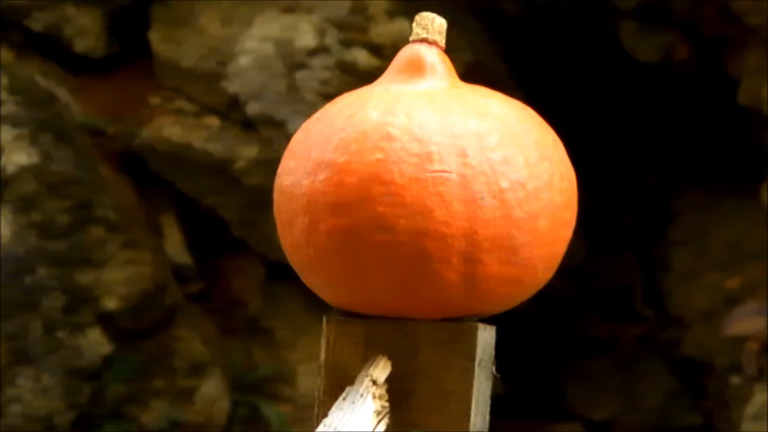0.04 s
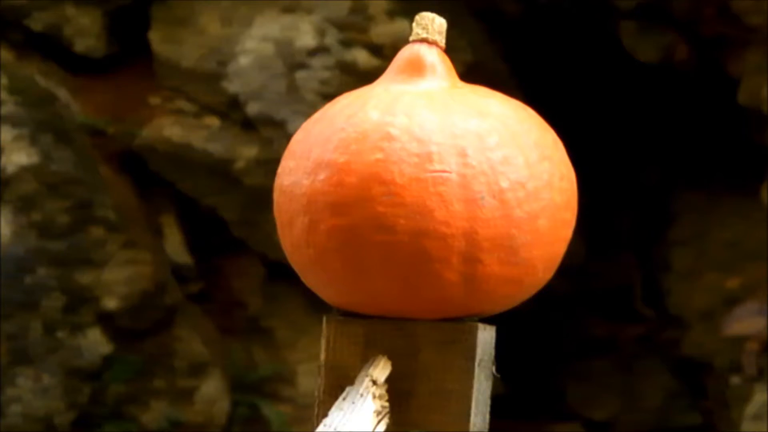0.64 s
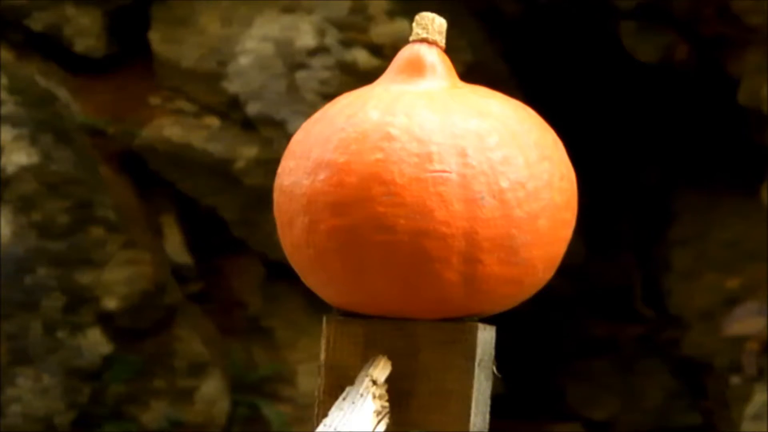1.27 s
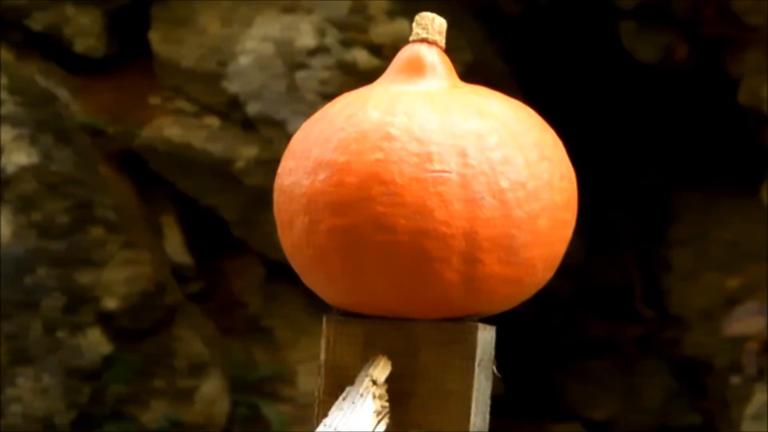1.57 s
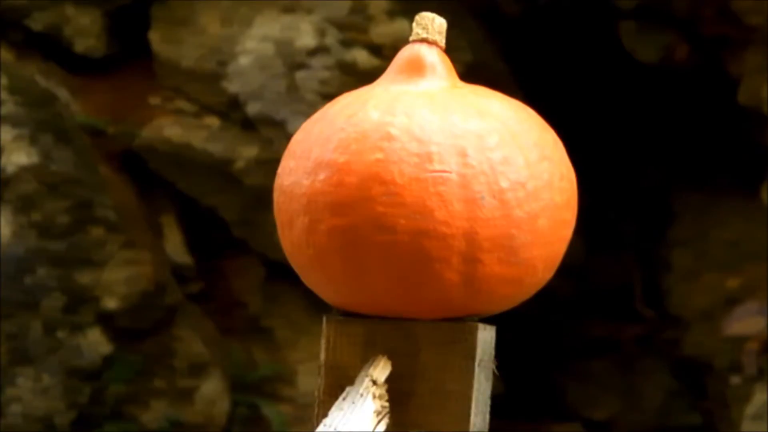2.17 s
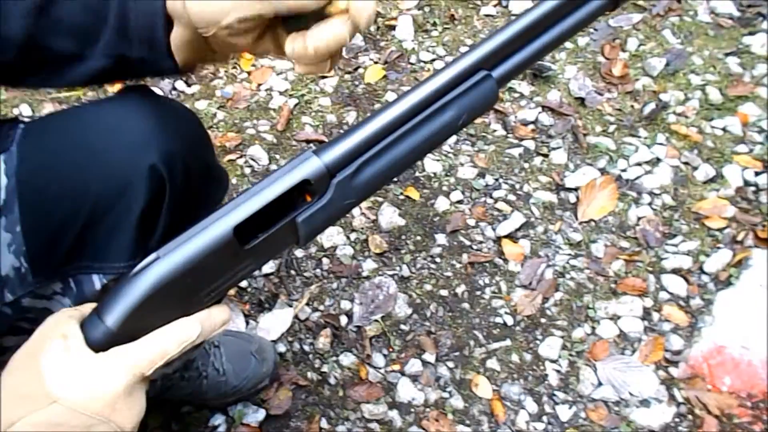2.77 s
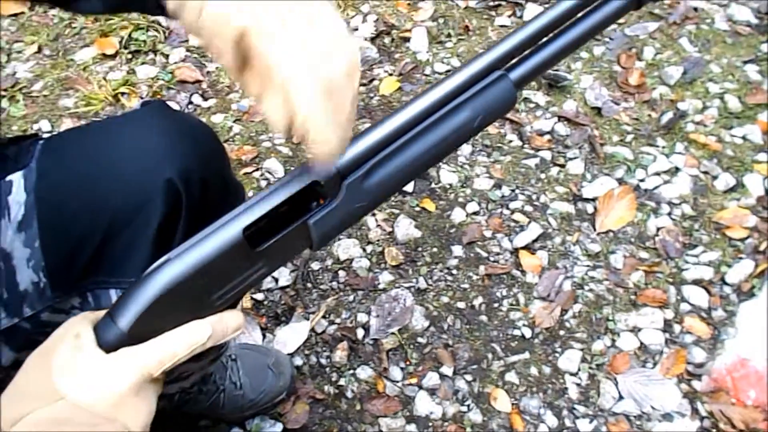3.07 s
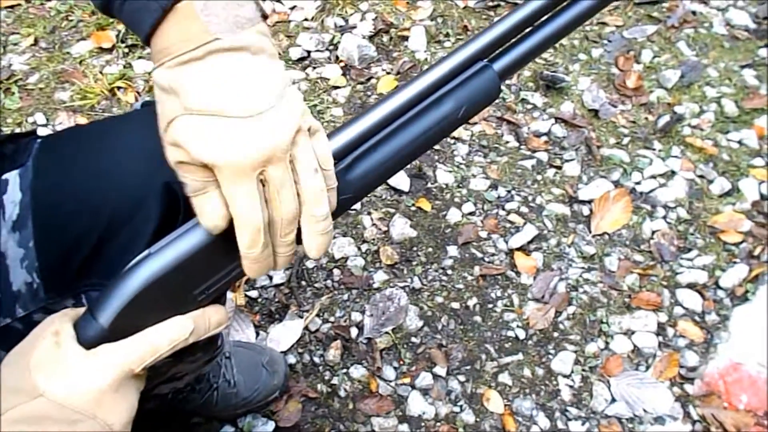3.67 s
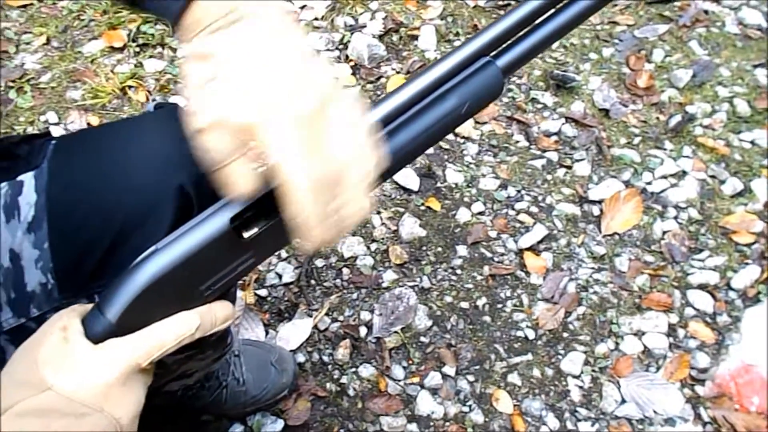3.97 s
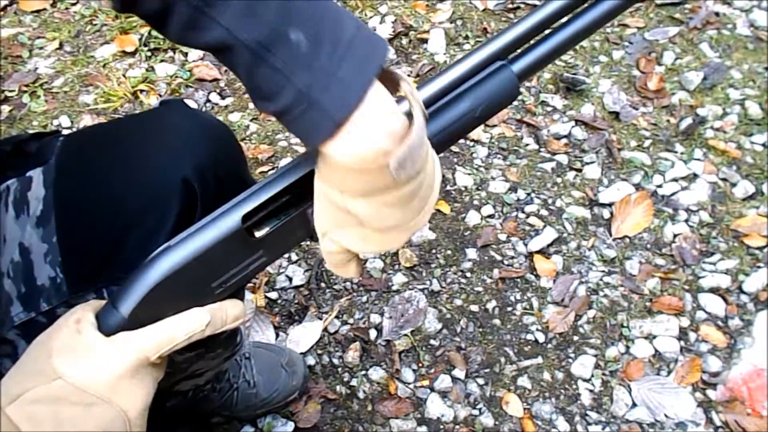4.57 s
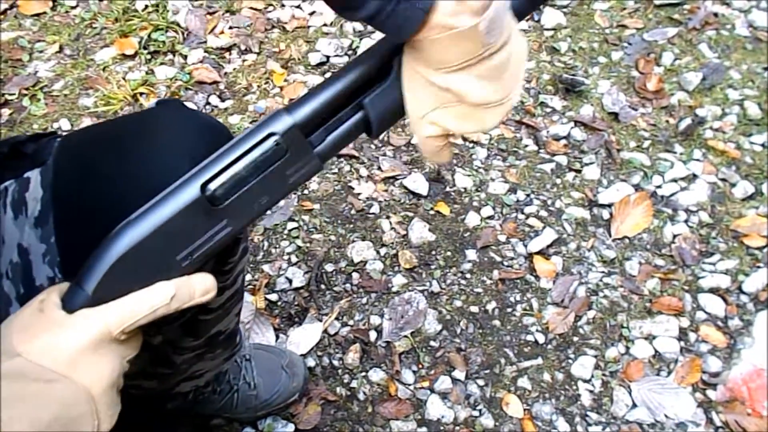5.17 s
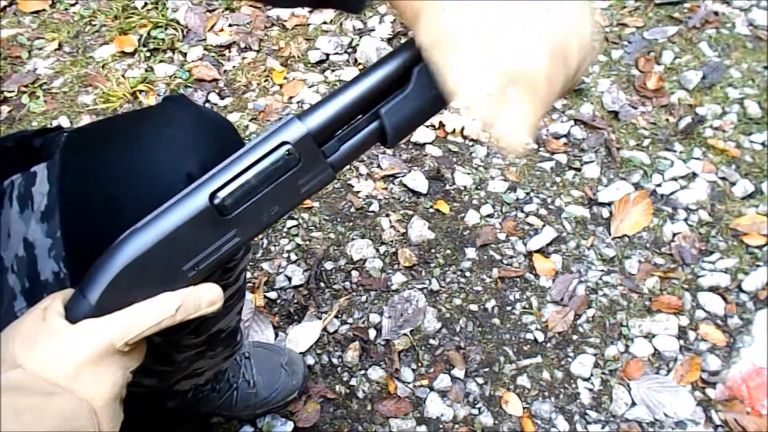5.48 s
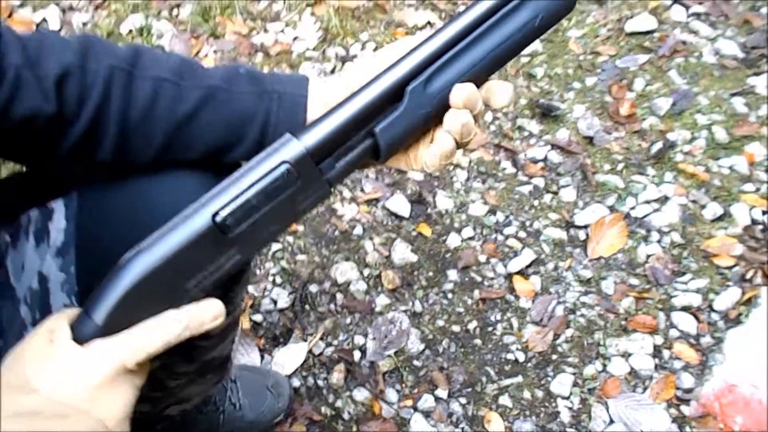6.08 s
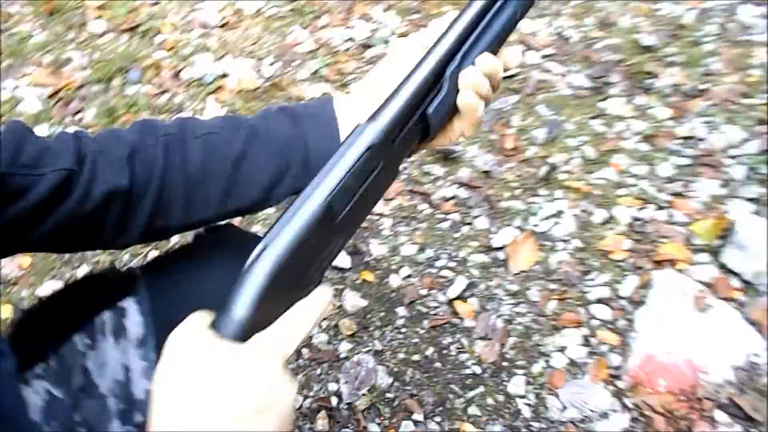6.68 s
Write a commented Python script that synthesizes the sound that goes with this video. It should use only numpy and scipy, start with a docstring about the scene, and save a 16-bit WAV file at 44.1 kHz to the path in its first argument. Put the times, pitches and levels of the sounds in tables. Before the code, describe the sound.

Over steady outdoor hiss, a shell rattles into a shotgun and the pump slides shut, first distant and echoing, then close and dry.

```python
"""A pump shotgun is loaded in a forest: a shell ticks into the open port and rattles home, then the
forend runs forward and the bolt locks. Each contact rings the receiver; steel slides, a glove brushes.
It is heard twice, with silence between: from a distant microphone, with the echo of the trees, then
nearly dry from one on the shooter. Each has its own outdoor hiss and its own treble notches."""
import sys
import numpy as np
from scipy import signal
from scipy.fft import rfft, irfft, next_fast_len
from scipy.io import wavfile
from scipy.ndimage import uniform_filter1d

SR = 44100
rng = np.random.default_rng(int(sys.argv[2]) if len(sys.argv) > 2 else 0)


def dump_mix(stems):
    """Bounce the given channels to the path in sys.argv[1] as a 16-bit WAV at rate SR."""
    frames = np.atleast_2d(stems).T  # one column per channel
    limited = np.clip(frames, -1, 1)  # hard clip at full scale
    pcm = np.round(limited * 32767).astype(np.int16)
    wavfile.write(sys.argv[1], SR, pcm)


N = 305789
TIME = np.arange(N) / SR
FAR_SPAN_S, NEAR_SPAN_S = (.175, 2.726), (3.192, 7)   # when each microphone is heard


def from_db(db):
    """Decibels to gain."""
    return 10 ** (np.asarray(db) / 20)


def gain_in_time(rows):
    """A level curve as a gain per sample."""
    return from_db(np.interp(TIME, *np.transpose(rows)))


def gain_at(points, hz):
    """A spectrum's gain at the given frequencies."""
    point_hz, db = np.transpose(points)
    return from_db(np.interp(np.log(hz + 1), np.log(point_hz), db))


def coloured(x, points):
    """Shape a long sound by a spectrum."""
    size = next_fast_len(len(x))
    gain = gain_at(points, np.fft.rfftfreq(size, 1 / SR))
    return irfft(rfft(x, size) * gain, size)[:len(x)]


def causal(gain):
    """The minimum-phase response with this gain: it rings after a blow, never before."""
    cepstrum = irfft(np.log(gain + 1e-9))
    half = len(cepstrum) // 2
    cepstrum[1:half] *= 2
    cepstrum[half + 1:] = 0
    return np.exp(rfft(cepstrum))


def resonance(hz, centre_hz, width_hz, db):
    """Power response of one mode."""
    return from_db(db) ** 2 / (1 + (2 * (hz - centre_hz) / width_hz) ** 2)


def add(out, sound, s):
    """Mix a sound in at a time."""
    start = int(np.clip(round(s * SR), 0, N - 1))
    out[start:start + len(sound)] += sound[:N - start]


def during(span):
    """One inside a stretch of time, zero outside."""
    return (TIME >= span[0]) & (TIME < span[1])


# forest air at the distant and the close microphone (frequency [Hz], level [dB])
FAR_AIR = [(20, -31), (58, -35.5), (80, -22.5), (115, -28), (250, -30), (450, -26), (1000, -27),
           (2200, -36), (5500, -38), (10000, -41), (15500, -51)]
NEAR_AIR = [(25, -69), (42, -47), (58, -48.5), (69, -30.5), (85, -42.5), (180, -37.5), (450, -39),
            (1000, -38.5), (2200, -51), (4700, -51), (6300, -55), (7800, -60.5), (10600, -65)]
# its slow drift (time [s], level [dB])
AIR_DRIFT = [(.17, 1.5), (2.05, 0), (2.3, -3), (2.72, -2), (3.2, 1), (5.5, 0), (6.9, 3.5)]
# its dips as the bolt slams shut (low point [s], treble depth [dB], sinking [s], recovery [s])
AIR_DIPS = [(2.14, 2.5, .12, 0.15), (5.31, 14.5, 0.21, 0.117)]


def air(spectrum, bass_hz=650, bass_dip_factor=1.8):
    """Outdoor hiss with a low drone; it dips after each slam, most in the bass."""
    hiss = coloured(rng.standard_normal(N), spectrum) * gain_in_time(AIR_DRIFT)
    bass = signal.sosfiltfilt(signal.butter(2, bass_hz, fs=SR, output="sos"), hiss)
    dip_db = sum(np.interp(TIME, (s - sink_s, s, s + recover_s), (0, -depth_db, 0))
                 for s, depth_db, sink_s, recover_s in AIR_DIPS)
    return bass * from_db(bass_dip_factor * dip_db) + (hiss - bass) * from_db(dip_db)


# the four bands of a contact: knock, clack, ring, tick (frequency [Hz])
CONTACT_HZ = [850, 2100, 4700, 9800]
# modes of the receiver and action bars (frequency [Hz], width [Hz], height [dB])
GUN_MODES = [(830, 140, -3), (1353, 110, -3.5), (1863, 130, 1), (2450, 220, -0.5), (2750, 110, -6.5),
             (3970, 200, -7.5), (4520, 420, -2), (4980, 420, 0), (5600, 220, 1)]


def clack(contact_ms, rings_hz, bands_db, rattle=0.29, rattle_s=0.0048, spread_db=2.5, size=4096):
    """One contact: a crack, then a few milliseconds of buzz through the gun's modes."""
    t, hz = np.arange(size) / SR, np.fft.rfftfreq(size, 1 / SR)
    age = t * 1000 / contact_ms
    crack = age * np.exp(1 - age)
    buzz = rattle * (1 - np.exp(-age)) * np.exp(-t / rattle_s)
    burst = rfft((crack + buzz) * rng.standard_normal(size))
    # every blow excites the modes in other proportions, and its spot brings out one or two rings
    body = 0.5 + sum(resonance(hz, f, width, db + spread_db * rng.standard_normal())
                     for f, width, db in GUN_MODES)
    body += sum(resonance(hz, f, width_hz=0.087 * f, db=10.5) for f in rings_hz)
    # the broad balance is set by the blow, the fine structure by chance
    broad_burst = uniform_filter1d(np.abs(burst) ** 2, size=70)
    broad_body = uniform_filter1d(uniform_filter1d(body, size=180), size=180)
    fine_gain = np.sqrt(body / (broad_burst * broad_body))
    knock_db, tick_db = bands_db[0], bands_db[-1]
    colour = [(120, knock_db - 17), (520, knock_db - 7), *zip(CONTACT_HZ, bands_db), (15000, tick_db - 8)]
    return irfft(burst * causal(fine_gain * gain_at(colour, hz)))


def blow(s, level_db, contact_ms, rings_hz, tilt_db, kind_db, pivot_hz=3150, spot_octaves=.6):
    """A contact coloured by its kind, its brightness and a broad lift around the struck spot's ring."""
    hz = np.array(CONTACT_HZ)
    spot_db = 5.5 * np.exp(-.5 * (np.log2(hz / rings_hz[0]) / spot_octaves) ** 2)
    bands_db = level_db + np.array(kind_db) + tilt_db * np.log2(hz / pivot_hz) + spot_db
    if s < FAR_SPAN_S[1]:
        bands_db[-1] += 9   # a stronger tick at the distant microphone
    return clack(contact_ms, rings_hz, bands_db)


# hits of the shell and, at 2.654 s, a brief, bright swish of glove or sleeve
# (time [s], level [dB], contact [ms], ring [Hz], brightness [dB/octave])
SHELL_AND_SWISH = [(0.5526, 6.5, .4, 4140, 0.9), (0.5666, -3.5, 1, 5160, -1), (0.6975, 7.5, 0.94, 1730, 2),
                   (0.7082, 5, 1.2, 5360, -3), (0.7246, 0, 1.1, 5350, 0), (0.7567, -1, .68, 5500, 7),
                   (0.7952, 7, 0.7, 3070, -0.5), (0.8151, 1.5, 0.49, 4760, 4),
                   (0.8528, -5.5, 1.1, 1267, -8.5), (0.9802, -2, 0.32, 3720, -2),
                   (1.0, -1.5, 0.96, 3760, -3), (2.654, -15, 2.9, 10000, 5),
                   (3.6653, -7.5, 3.33, 4540, -4.5), (3.7177, 13, 0.475, 4970, 0),
                   (3.7673, -12, 1.1, 2240, -3), (3.8627, 11.5, 0.49, 5630, -2),
                   (3.8724, 5.5, 1.56, 5490, 2.5), (3.8899, 6, .9, 5550, 1.5), (3.922, 6, 0.98, 4670, 1),
                   (3.9296, -0.5, .75, 5520, 5.5), (3.942, -10, 0.68, 2680, -7),
                   (3.96, 11.5, .2, 2980, 1.7), (3.9799, 3.5, 1.5, 4760, 2), (4.0174, -0.5, 1.9, 4570, -1),
                   (4.0461, -1, 3, 5360, -2.5), (4.0599, -9, 0.91, 4520, -5.5),
                   (4.098, -11.5, 2.05, 1840, 0.5), (4.1461, -12, 1.5, 2730, -2)]
# their tone (knock [dB], clack [dB], ring [dB], tick [dB])
SHELL_DB = [-6, -3, -0.3, -11]


def shell_and_swish(rebound_s=(0.0055, .03), rebound_loss_db=24):
    """The shell drops in and rattles home; glove or sleeve swishes once. Each contact has one rebound."""
    out = np.zeros(N)
    for s, db, contact_ms, ring_hz, tilt_db in SHELL_AND_SWISH:
        for delay_s, loss_db in ((0, 0), (rng.uniform(*rebound_s), rebound_loss_db)):
            add(out, blow(s, db - loss_db, contact_ms, [ring_hz], tilt_db, SHELL_DB), s + delay_s)
    return out


# what the trees and rocks around the shooter scatter back (frequency [Hz], level [dB])
FOREST_COLOUR = [(100, -4), (550, -11), (900, -4), (1750, -1.5), (2400, -5.5), (3200, -3.5), (5200, -1.5),
                 (10000, -1), (15500, -4)]


def forest_echo(x, onset_s=0.002, treble_hz=7000, low_t60_s=0.49, treble_t60_s=0.39):
    """Diffuse echo from trunks and rocks; its treble dies sooner."""
    t = TIME[:SR]
    scatter = rng.standard_normal(SR)
    low = signal.sosfiltfilt(signal.butter(2, treble_hz, fs=SR, output="sos"), scatter)
    echo = low * from_db(-60 * t / low_t60_s) + (scatter - low) * from_db(-60 * t / treble_t60_s)
    echo *= 1 - np.exp(-t / onset_s)
    return signal.fftconvolve(x, coloured(echo / np.linalg.norm(echo), FOREST_COLOUR))[:N]


def friction(gain, colour, slips_per_s, smooth):
    """Rubbing: tiny slips at random over a smooth hiss."""
    chance = slips_per_s / SR
    slips = (rng.random(N) < chance) * rng.standard_normal(N) / np.sqrt(chance)
    grain = (slips + smooth * rng.standard_normal(N)) / np.hypot(1, smooth)
    return coloured(grain * gain, colour)


# slides inside the action (start [s], end [s], start level [dB], end level [dB])
SLIDES = [(0.714, 0.846, -33, -38.5), (1.946, 2.033, -28, -16.5), (2.039, 2.08, -18, -21.5),
          (3.858, 4.116, -36.5, -46.5), (5.119, 5.204, -35, -34), (5.206, 5.23, -32.5, -16),
          (5.244, 5.266, -32, -19)]
# their tone (frequency [Hz], level [dB])
SLIDE_COLOUR = [(100, -28), (500, -8), (1000, -3.5), (1900, 2.5), (3100, 0.5), (4600, 5.5), (6500, -3),
                (10000, -13.5), (15000, -11)]


def steel_slides(attack_db_per_s=3000, release_db_per_s=1297.5):
    """Steel rubs on steel, its level following the speed: quick start, swell or fade, quick stop."""
    gain = np.zeros(N)
    for start, end, start_db, end_db in SLIDES:
        level_db = np.interp(TIME, (start, end), (start_db, end_db))
        level_db -= attack_db_per_s * np.clip(start - TIME, 0, 1)
        level_db -= release_db_per_s * np.clip(TIME - end, 0, 1)
        gain += from_db(level_db)
    return friction(gain, SLIDE_COLOUR, slips_per_s=2700, smooth=0.9)


# brushes along the gun (peak time [s], level [dB], time to fall by fade_db on either side [s])
BRUSHES = [(.99, -26, 0.01), (1.6, -44.5, 0.31), (2.25, -37, 0.0135), (2.72, -49, 0.8), (3.77, -45.5, 0.25),
           (4.165, -44, 0.21), (4.83, -46.5, 0.24), (5.44, -42, 0.15), (6.13, -49, 0.2), (6.33, -41, .07),
           (6.47, -41.5, 0.15), (6.9, -46, 0.75)]
# their tone (frequency [Hz], level [dB])
GLOVE_COLOUR = [(100, -29), (900, -7), (2000, -0.5), (4500, 3), (6500, -3), (10000, -12.5), (15000, -16.5)]


def glove(fade_db=11.5):
    """Glove and sleeve rub the gun; each brush swells and fades evenly."""
    level_db = np.max([db - fade_db * np.abs(TIME - s) / fade_s for s, db, fade_s in BRUSHES], axis=0)
    return friction(from_db(level_db), GLOVE_COLOUR, slips_per_s=2500, smooth=0.55)


# clicks of the forend (time [s], level [dB], ring [Hz])
FOREND_CLICKS = [(1.8614, -2, 1603), (2.3318, -5.5, 2950), (5.049, 3.5, 2037), (5.1046, -2, 2010),
                 (5.521, 8.5, 2420), (5.5659, -2, 2386), (6.4731, -2.5, 3600)]
# their tone (knock [dB], clack [dB], ring [dB], tick [dB])
FOREND_DB = [-9.5, 0, -1, -21]


def forend(contact_ms=.45, mode_hz=4200):
    """The forend clicks in its play, ringing the struck spot and a mode of its own."""
    out = np.zeros(N)
    for s, db, ring_hz in FOREND_CLICKS:
        add(out, blow(s, db, contact_ms, [ring_hz, mode_hz], tilt_db=0, kind_db=FOREND_DB), s)
    return out


# strikes in the receiver (time [s], level [dB], contact [ms], ring [Hz], brightness [dB/octave])
BOLT_HITS = [(1.935, 8, 1.5, 2400, 0.5), (1.9509, 5.5, 1.2, 1240, -2.5), (1.956, 3.5, 1.5, 4590, 0),
             (1.9664, 3, 1.8, 5250, 3.5), (1.9871, 8, 2.2, 1690, 1), (2.005, 2, 1.6, 2350, -1.5),
             (2.0133, 0, 1.7, 4700, 4.5), (2.0271, 7, 1.5, 1890, 2), (2.0334, 11, 1.7, 1399, -0.5),
             (2.0465, 11, 1.7, 1780, 2), (2.0633, 3, 1.5, 4030, 1.5), (2.0741, 16.5, 1.05, 2844, -1.5),
             (2.084, 6.5, 1.74, 10000, 3), (5.1242, 7.5, 0.2, 4580, 1), (5.139, -3, 1.5, 5020, -2),
             (5.1453, 4, 0.37, 3680, 0.5), (5.1554, 0, 0.35, 4800, 7.5), (5.177, 4.5, 0.46, 5070, 1.5),
             (5.192, -5, .55, 4870, 2), (5.209, -5, 1.8, 4530, 4), (5.2211, 6.5, 0.76, 1833, -0.5),
             (5.2322, 5.5, 0.87, 4810, 3), (5.2572, 2, .68, 4520, 0), (5.262, 10, 0.73, 2363, 3.5),
             (5.2714, -6, 0.79, 10100, 10.5)]
# their tone (knock [dB], clack [dB], ring [dB], tick [dB])
BOLT_DB = [-1.5, -0.5, 0, -7]


def bolt():
    """Carrier, action bars and bolt strike as the forend runs forward."""
    out = np.zeros(N)
    for s, db, contact_ms, ring_hz, tilt_db in BOLT_HITS:
        add(out, blow(s, db, contact_ms, [ring_hz], tilt_db, BOLT_DB), s)
    return out


def damped_tones(rows, rise_s):
    """Single decaying modes, each set off by a blow."""
    out, t = np.zeros(N), TIME[:SR // 2]
    for s, hz, db, t60 in rows:
        envelope = from_db(db - 60 * t / t60) * (1 - np.exp(-t / rise_s))
        add(out, envelope * np.sin(2 * np.pi * hz * t), s)
    return out


# pings heard at the distant microphone (time [s], pitch [Hz], level [dB], t60 [s])
BAR_PINGS = [(2.0325, 1810, -5, .02), (2.0445, 1790, -9, .018), (2.064, 1840, -14, .018)]


def bar_pings():
    """The action bars ping as they drag through the receiver."""
    return damped_tones(BAR_PINGS, rise_s=.0005)


# low thumps and knocks (time [s], pitch [Hz], level [dB], t60 [s])
THUMPS = [(2.075, 248.5, -26, 0.04), (2.085, 300, -26, .03), (3.863, 408, -28, 0.014),
          (5.124, 300, -24.5, 0.014), (5.177, 260, -36, .015), (6.736, 252, -26, 0.024),
          (6.872, 342, -30, .03), (6.895, 312.3, -23.5, 0.0165), (6.909, 328, -33, 0.0224),
          (6.923, 280, -30, 0.0265)]


def thumps():
    """Low thumps under the heavy steel hits, and dull handling knocks at the end."""
    return damped_tones(THUMPS, rise_s=0.0015)


# notes of the barrel (time [s], pitch [Hz], level [dB], t60 [s])
BARREL_NOTES = [(2.086, 788.6, -36, 0.45), (3.667, 690, -34, 0.077), (3.978, 695.4, -37, 0.305),
                (5.222, 757, -28, 0.058)]


def barrel():
    """The barrel tube hums on after some blows."""
    return damped_tones(BARREL_NOTES, rise_s=0.00308)


# hum at the distant microphone (time [s], level [dB])
HUM_LEVEL = [(2.1, -21), (2.35, -6), (2.55, 1), (2.72, -0.5), (3.2, -42.5)]
# its tone (frequency [Hz], level [dB])
HUM_COLOUR = [(100, -71), (155, -38), (176, -19.5), (198, -39.5), (300, -68.5), (1000, -120)]


def low_hum():
    """A faint, narrow band of low noise swells for a moment."""
    return coloured(rng.standard_normal(N), HUM_COLOUR) * gain_in_time(HUM_LEVEL)


# taps heard at the close microphone (time [s], level [dB], ring [Hz])
STOCK_TAPS = [(3.28, -7, 1380), (4.7274, -10.5, 1310), (6.208, -14, 1225), (6.686, -12, 1150),
              (6.826, -2.5, 1340), (6.871, -0.5, 1230), (6.896, -12, 2070)]
# their tone (knock [dB], clack [dB], ring [dB], tick [dB])
STOCK_DB = [-1.5, -5.5, -12, -31]


def finger_taps(contact_ms=0.65):
    """Fingers tap the stock: mostly knock, hardly any tick."""
    out = np.zeros(N)
    for s, db, ring_hz in STOCK_TAPS:
        add(out, blow(s, db, contact_ms, [ring_hz], tilt_db=0, kind_db=STOCK_DB), s)
    return out


def scene(far_echo_db=-1.5, near_echo_db=-33):
    """The gun from afar among the trees, then from the shooter's position."""
    gun = shell_and_swish() + steel_slides() + forend() + bolt() + finger_taps()
    echo = forest_echo(gun)
    direct = gun + glove() + bar_pings() + thumps() + barrel()
    far = direct + from_db(far_echo_db) * echo + air(FAR_AIR) + low_hum()
    near = direct + from_db(near_echo_db) * echo + air(NEAR_AIR)
    return (far * during(FAR_SPAN_S) + near * during(NEAR_SPAN_S))[None]


# treble notches of the distant and the close microphone (frequency [Hz], width [Hz])
FAR_NOTCHES = [(7800, 1800), (8000, 900), (11800, 870)]
NEAR_NOTCHES = [(7000, 1444), (8500, 1370), (10000, 720)]


def microphone(x, notches, top_hz, order):
    """One microphone's sound path: treble notches and a band limit."""
    for hz, width in notches:
        x = signal.lfilter(*signal.iirnotch(hz, hz / width, fs=SR), x)
    return signal.sosfilt(signal.cheby1(order, .2, top_hz, fs=SR, output="sos"), x)


def record(dry):
    """Peaks clip; each position is heard through its own microphone; the top is cut."""
    dry = np.clip(dry, -1.05, 1.05)
    far = microphone(dry * during(FAR_SPAN_S), FAR_NOTCHES, top_hz=15650, order=18)
    near = microphone(dry * during(NEAR_SPAN_S), NEAR_NOTCHES, top_hz=10850, order=14)
    return signal.sosfilt(signal.cheby2(16, 90, 16900, fs=SR, output="sos"), far + near)


dry = scene()
out = record(dry)
dump_mix(out)
```